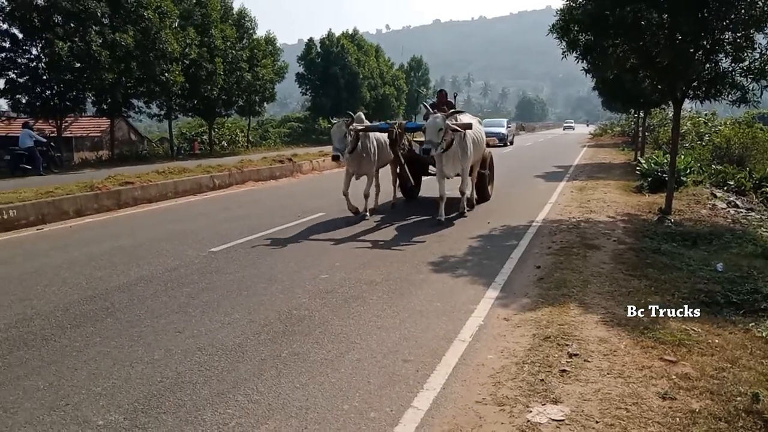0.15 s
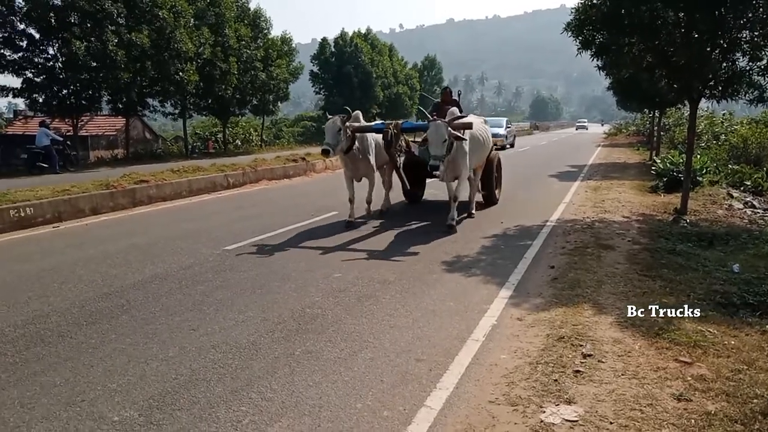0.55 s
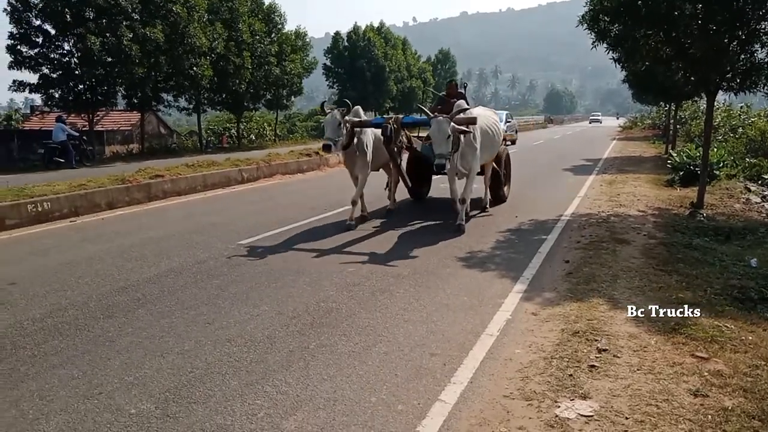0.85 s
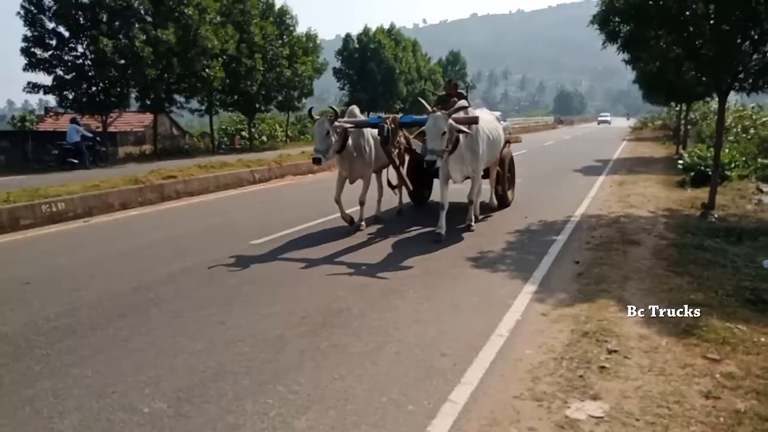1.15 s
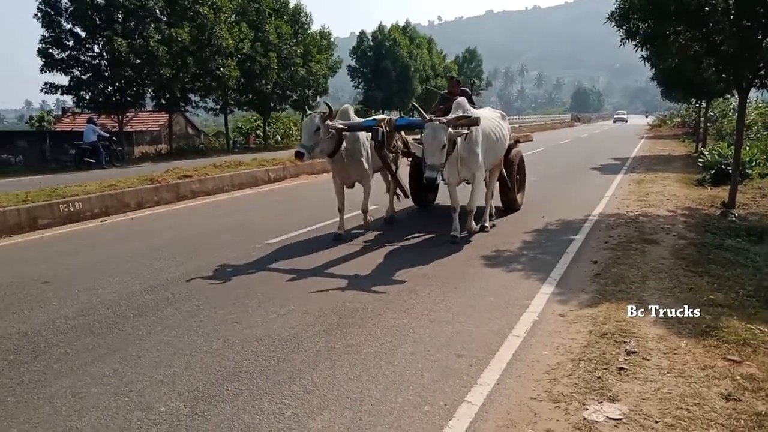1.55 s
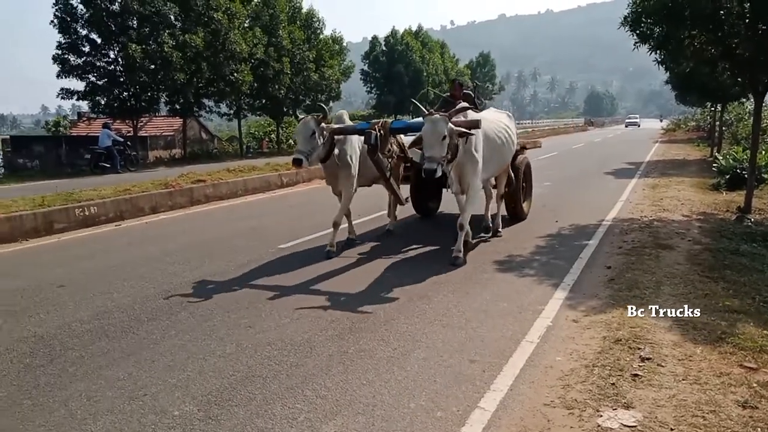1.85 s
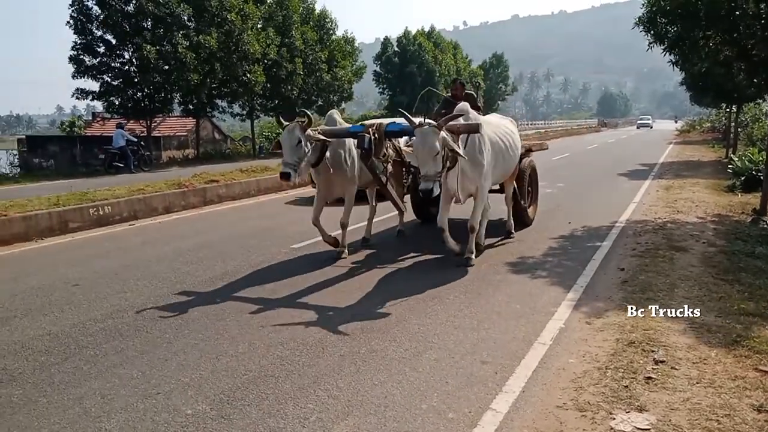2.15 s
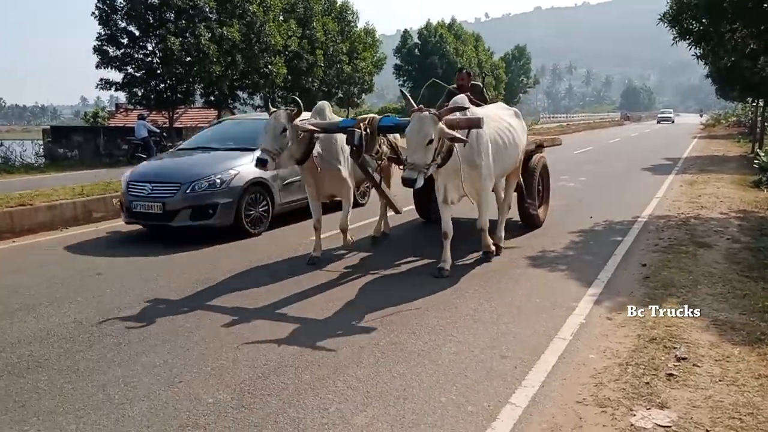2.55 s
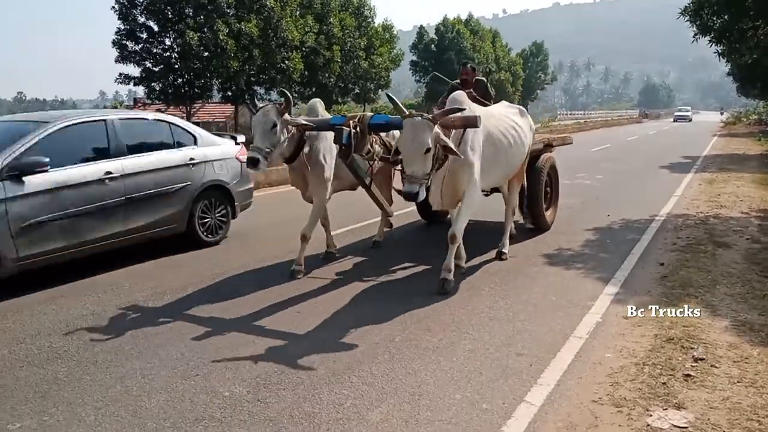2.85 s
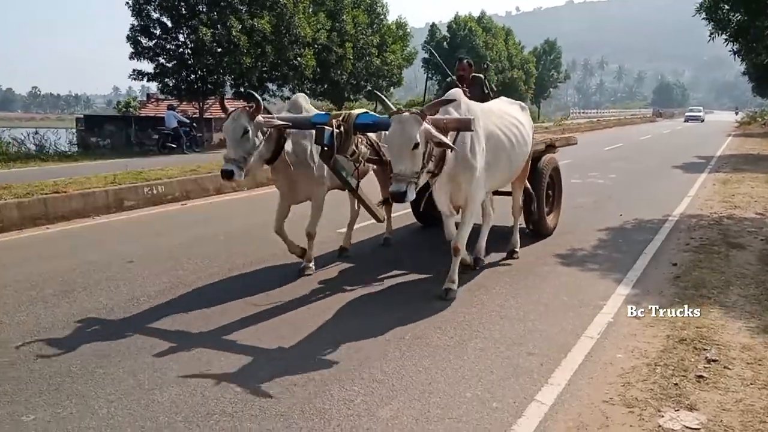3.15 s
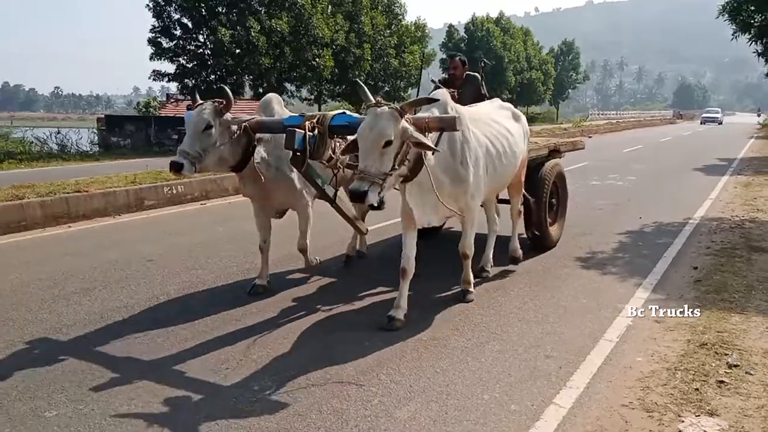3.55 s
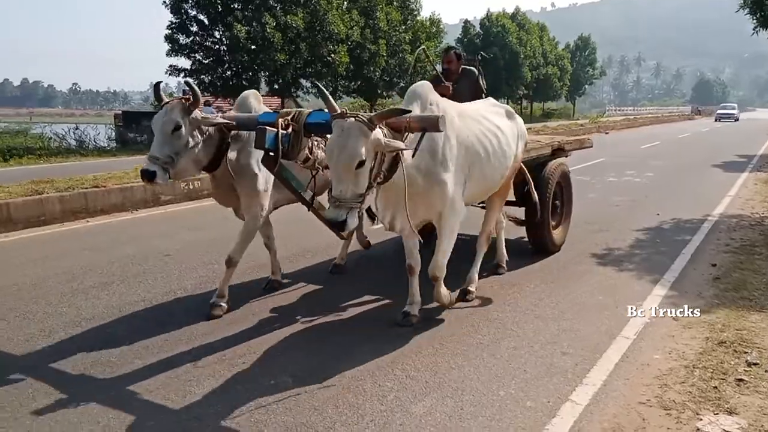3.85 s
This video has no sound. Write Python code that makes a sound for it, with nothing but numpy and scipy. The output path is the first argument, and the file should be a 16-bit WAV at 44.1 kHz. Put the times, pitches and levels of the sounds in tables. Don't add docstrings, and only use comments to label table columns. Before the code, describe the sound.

A car's tyre roar swells from behind as ox hooves clack sharply and irregularly on tarmac.

```python
import sys
import numpy as np
from scipy import signal
from scipy.fft import rfft, irfft
from scipy.io import wavfile
from scipy.ndimage import uniform_filter1d

SR = 44100
rng = np.random.default_rng(int(sys.argv[2]) if len(sys.argv) > 2 else 0)


def file_out(sig):
    cols = np.atleast_2d(sig).T
    lim = np.clip(cols, -1, 1)
    pcm = np.round(lim * 32767).astype(np.int16)
    wavfile.write(sys.argv[1], SR, pcm)


def ratio_of_db(decibels):
    return 10 ** (np.asarray(decibels, float) / 20)


N = 176400
F = np.fft.rfftfreq(N, 1 / SR)

# time_s, level_db, brightness_db_per_octave, engine_rumble_db, mirror_lag_ms, tread_bite_db
CAR_APPROACH = [
    (0, -58, 6.5, 14.5, 1.39, 9.5),
    (.62, -55.5, -1, 9, 1.14, 3),
    (1.17, -47, 0, 4.5, 1.47, -2),
    (1.76, -43.5, -3, 6.5, 1.27, -6),
    (2.1, -39, -3.5, 2, 1.33, -1.5),
    (2.5, -33, -1, -3.5, 1.2, -1.5),
    (2.82, -29.5, 0, 1.5, 0.95, 3),
    (3.3, -28, 5, -7, 0.62, 3.5),
    (3.65, -27, 5.5, -10.5, 0.51, -2),
    (4, -28.5, 6, -15, 0.47, 1),
]
# frequency_hz, density_db_per_hz
TYRE_SPECTRUM = [(24, -74), (40, -31.5), (241, 0.5), (449, -5), (1250, -3.5), (4680, -17), (6160, -16),
                 (8110, -37), (15500, -41.5)]
# start_s, peak_db, brightness_db_per_octave, scrape_ms
EARLY_HOOF_FALLS = [(0.0495, -44, 11, 2.9), (0.064, -39, -1, 11), (0.1344, -47, -9, 6.6),
                    (0.307, -26.5, 3, 4.6), (0.3414, -37.5, -6, 5.3), (0.361, -40, 0, 4.9),
                    (0.618, -47, -7, 6), (0.6334, -39, -6, 8.1), (0.643, -39, -7, 6.5),
                    (0.7625, -49, -10, 6.8), (0.7957, -30.5, 3, 8), (0.8104, -36, -9, 10.6),
                    (0.9014, -40, 12, 4.8), (0.9125, -35.5, -5.5, 6), (0.9532, -42, -9, 8.9),
                    (1.119, -45, -10, 6), (1.1454, -49, 0, 6), (1.1838, -34.5, -8.5, 13),
                    (1.22, -34.5, 7, 8.5), (1.2914, -47, 17, 6), (1.3172, -22.5, 1, 6),
                    (1.3255, -29, 0, 7.8), (1.4431, -37, 8, 8.6), (1.4574, -46, -12, 12),
                    (1.476, -35, -5.5, 11), (1.57, -44, -6, 6.8)]
# start_s, peak_db, brightness_db_per_octave, scrape_ms
LATE_HOOF_FALLS = [(1.647, -40.5, -10.5, 36), (1.771, -28, 2, 6.9), (1.794, -26, -3, 4.4),
                   (1.804, -36, -6, 9), (1.852, -44, 13, 6), (1.889, -37, 22, 4), (1.917, -42, -5, 5.4),
                   (1.949, -50, 0, 16), (2.04, -51, 5, 6), (2.052, -37.5, -8.5, 5.7), (2.07, -40, -1, 8.8),
                   (2.209, -44, 19, 4.7), (2.233, -32, 11, 3.1), (2.274, -40, -1, 7), (2.32, -34, -3, 12),
                   (2.345, -26.5, -2, 8.6), (2.377, -35, 6, 7), (2.619, -40, 4, 6), (2.652, -29.5, -2, 7),
                   (2.815, -24.5, -7, 8), (2.925, -22, 2, 15), (2.971, -25.5, 7, 5.7), (3.015, -27.5, 9, 6),
                   (3.23, -29.5, 10, 7), (3.34, -37, 8, 4), (3.52, -32, 10, 4), (3.691, -31, 7, 5),
                   (3.801, -31, 11, 11), (3.855, -31, 15, 9)]
# frequency_hz, gain_db
HOOF_SPECTRUM = [(300, -26), (1000, -24), (3000, 7), (6000, 14), (9000, 3), (12000, 4), (15500, 9.5)]
# start_s, pitch_hz, level_db
SHOE_RINGS = [
    (.05, 11600, -40.5),
    (.051, 6800, -39.5),
    (.615, 7490, -32.5),
    (1.169, 6700, -41),
    (1.292, 11200, -44),
    (1.772, 7480, -30.5),
    (2.052, 15100, -38),
    (2.62, 12600, -42),
    (2.653, 7470, -33),
]
# start_s, length_s, level_db, centre_hz
HOOF_DRAGS = [
    (0.298, 0.047, -50, 10500),
    (0.626, 0.13, -51.5, 6200),
    (0.886, 0.076, -50.5, 6800),
    (1.1, 0.23, -53, 6000),
    (1.429, 0.097, -55, 7800),
    (1.784, 0.16, -65, 9000),
    (2.048, 0.031, -45.5, 9000),
    (2.196, 0.75, -55, 8040),
]
# start_s, length_s, start_pitch_hz, end_pitch_hz, level_db
BIRD_CHIRPS = [
    (.19, .035, 7000, 5500, -67),
    (.66, .05, 6900, 6100, -64),
]
# centre_s, level_db, half_length_s
WIND_PUFFS = [
    (0.147, -46.5, 0.034),
    (0.204, -46, .03),
    (0.314, -44.5, 0.035),
]
# frequency_hz, gain_db
WIND_SPECTRUM = [(40, -17), (90, 0.5), (170, 1.5), (300, -30), (900, -60)]
# centre_hz, width_hz, level_db
FAR_BANDS = [(108, 69, -5.5), (650, 173, -8), (1283, 150, 0.5), (1404, 175, 4.5), (1963, 247, -1),
             (2474, 407, -6)]
# time_s, level_db
FAR_SWELL = [(0, -49.5), (.6, -47.5), (1.2, -44), (1.9, -39.5), (2.4, -37.5), (4, -41)]
# centre_hz, width_hz, gain_db
CASE_RESONANCES = [(292, 53, 0), (1242, 82, 7), (1598, 170, 6), (2160, 67, 2.5), (2396, 317, 6),
                   (4090, 480, 7), (4580, 1500, -9.5), (6010, 167, 6.5), (6440, 150, -2), (7280, 560, 6),
                   (9220, 290, 5), (14040, 3130, -13), (15000, 1000, 7.5)]


def level(x, db):
    return x * ratio_of_db(db) / np.sqrt(np.mean(x ** 2))


def on_log(points):
    hz, db = np.array(points, float).T
    return np.interp(np.log(F + 1), np.log(hz), db)


def colour(x, db):
    cepstrum = irfft(db * np.log(10) / 20, N)
    cepstrum[1:N // 2] *= 2
    cepstrum[N // 2 + 1:] = 0
    return irfft(rfft(x) * np.exp(rfft(cepstrum)), N)


def walk(rate_hz):
    hold = int(SR / rate_hz)
    steps = np.repeat(rng.standard_normal(N // hold + 1), hold)
    smooth = uniform_filter1d(uniform_filter1d(steps, hold), hold)
    return 1.3 * smooth[:N]


def car(t):
    swell_db, flicker_db, mirror_gain = .7, 1.4, 0.52
    approach = np.array(CAR_APPROACH).T
    db, tilt, rumble, lag_ms, bite = (np.interp(t, approach[0], column) for column in approach[1:])
    tyre_gain = ratio_of_db(on_log(TYRE_SPECTRUM)) / (1 + (85 / (F + 1)) ** 3)
    tyres = level(irfft(rfft(rng.standard_normal(N)) * tyre_gain, N), 0)
    spectrum = rfft(tyres)
    roar, swell = 0, walk(2.22)
    for octave in np.arange(-11, 8) / 2:
        window = np.clip(1 - 2 * abs(np.log2(F / 1500 + 1e-9) - octave), 0, 1)
        band = irfft(spectrum * window, N)
        low = 1 / (1 + 2 ** (2 * (octave + 2)))
        band_db = db + tilt * np.clip(octave - 1, 0, 1.9) + rumble * low + bite * (0 < octave < 1.4)
        band_db = band_db + swell_db * swell + flicker_db * (1 + low) * walk(9)
        roar = roar + band * ratio_of_db(band_db)
    dull = irfft(rfft(roar) / (1 + (F / 1000) ** 4), N)
    late = np.interp(t - lag_ms / 1000, t, dull)
    return roar + mirror_gain * late


def hoof_falls():
    grains_per_s, grain_spread_db, ragged_db = 2200, 2.6, 6.5
    tail_db, tail_s, attack_s = -18, .03, 0.00068
    hits = np.zeros(N)
    u = np.arange(SR // 8) / SR
    octave = np.log2(np.fft.rfftfreq(len(u), 1 / SR) / 8000 + .02)
    for start, db, tilt, scrape_ms in list(EARLY_HOOF_FALLS) + list(LATE_HOOF_FALLS):
        noise = rng.standard_normal(len(u))
        clicks = rng.random(len(u)) < grains_per_s / SR
        size = ratio_of_db(grain_spread_db * rng.exponential(size=len(u)))
        grit = clicks * np.sign(noise) * size + 0.53 * noise
        shape = np.exp(-u * 1000 / max(scrape_ms, .5)) * (1 - np.exp(-u / attack_s))
        tail = ratio_of_db(tail_db) * noise[::-1] * np.exp(-u / tail_s)
        hit = grit * shape + tail
        ragged = np.interp(np.arange(len(octave)), np.linspace(0, len(octave), 24), rng.standard_normal(24))
        hit = irfft(rfft(hit) * ratio_of_db(tilt * np.clip(octave, -2, .5) + ragged_db * ragged), len(u))
        i = int(start * SR)
        hits[i:i + len(u)] += ratio_of_db(db - 11) * hit[:N - i]
    return colour(hits, on_log(HOOF_SPECTRUM))


def shoe_rings():
    trim_db, decay_60db_s = -2, .035
    rings = np.zeros(N)
    u = np.arange(SR // 8) / SR
    for start, hz, db in SHOE_RINGS:
        i = int(start * SR)
        wobble = 7 * uniform_filter1d(rng.standard_normal(len(u)), size=60)
        tone = np.sin(2 * np.pi * hz * u + wobble)
        decay = ratio_of_db(db + trim_db - 60 * u / decay_60db_s)
        rings[i:i + len(u)] += decay * tone * (1 - np.exp(-u / .0007))
    return rings


def hoof_drags(t):
    drags = np.zeros(N)
    for start, length, db, hz in HOOF_DRAGS:
        band = 1 / (1 + (np.log2(F / hz + 1e-9) / 0.31) ** 2)
        drag = irfft(rfft(rng.standard_normal(N)) * band, N)
        p = np.clip((t - start) / length, 0, 1)
        drags += level(drag, db) * ratio_of_db(3.5 * walk(90)) * p ** .25 * (1 - p)
    return drags


def cart(t):
    cart_db, centre_hz, patchy_db, nearer_db_per_s = -72.5, 6000, 5, 0.53
    hiss, rustle = rfft(rng.standard_normal(N)), 0
    for hz in centre_hz * 1.17 ** np.arange(-3, 3):
        band = irfft(hiss / (1 + ((F - hz) / (.07 * hz)) ** 4), N)
        flutter_db = patchy_db * (walk(8.45) + walk(35.24))
        rustle = rustle + level(band, cart_db - 7.5) * ratio_of_db(flutter_db + nearer_db_per_s * t)
    return rustle


def bird(t):
    song = 0
    for start, length, from_hz, to_hz, db in BIRD_CHIRPS:
        p = np.clip((t - start) / length, 0, 1)
        phase = 2 * np.pi * np.cumsum(from_hz + (to_hz - from_hz) * p) / SR
        song = song + ratio_of_db(db) * np.sin(np.pi * p) * np.sin(phase)
    return song


def wind(t):
    rumble = level(colour(rng.standard_normal(N), on_log(WIND_SPECTRUM)), 0)
    return rumble * sum(ratio_of_db(db) * np.exp(-((t - centre) / width) ** 2) for centre, db, width in WIND_PUFFS)


def far_road(t):
    power = sum(ratio_of_db(2 * db) / (1 + (2 * (F - hz) / width) ** 6) for hz, width, db in FAR_BANDS)
    hum = level(irfft(rfft(rng.standard_normal(N)) * np.sqrt(power), N), 0)
    swell_db = np.interp(t, *np.array(FAR_SWELL).T)
    return hum * ratio_of_db(swell_db + .7 * walk(4.9))


def scene():
    t = np.arange(N) / SR
    hooves = hoof_falls() + shoe_rings() + hoof_drags(t)
    return (car(t) + hooves + cart(t) + bird(t) + wind(t) + far_road(t))[None]


def roll_off(x):
    return signal.sosfilt(signal.butter(12, 16620, fs=SR, output="sos"), x)


def record(dry):
    top_hz = 15480
    db = sum(gain / (1 + (2 * (F - hz) / width) ** 2) for hz, width, gain in CASE_RESONANCES)
    db = db - np.clip((F - top_hz) / 80, 0, 1) * 22
    db = db - np.clip((F - top_hz) / 1000, 0, 1) * 25
    mix = colour(dry[0], db)[None]
    return roll_off(mix)


dry = scene()
out = record(dry)
file_out(out)
```